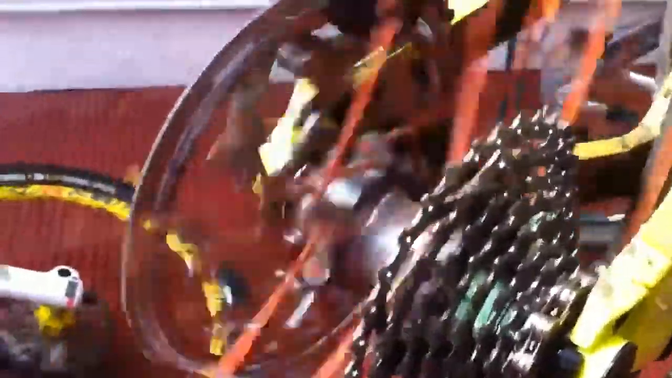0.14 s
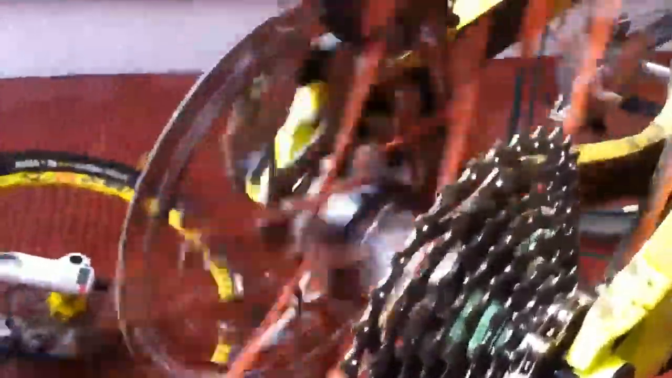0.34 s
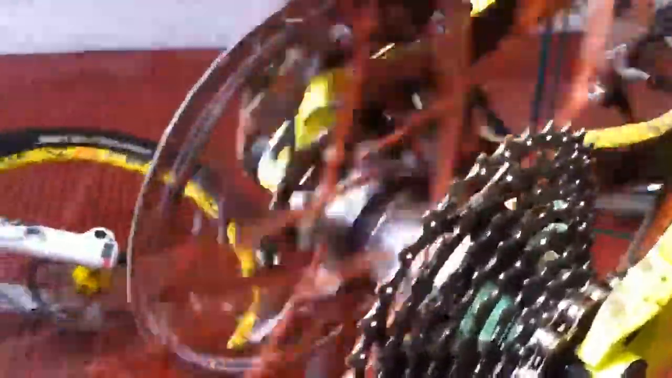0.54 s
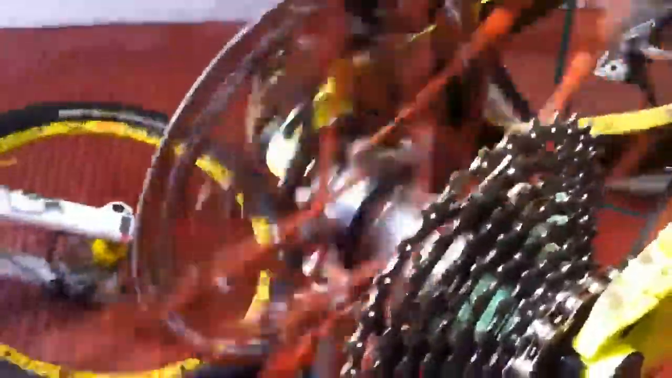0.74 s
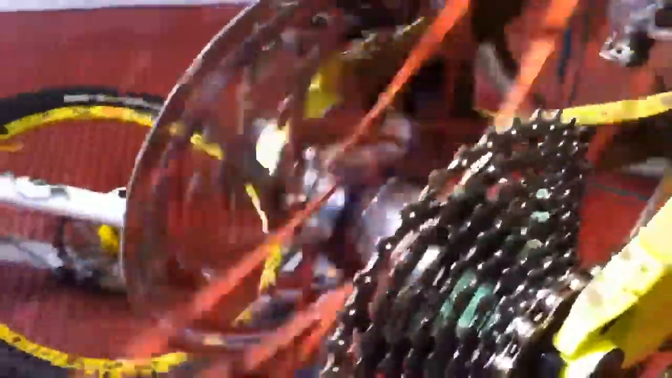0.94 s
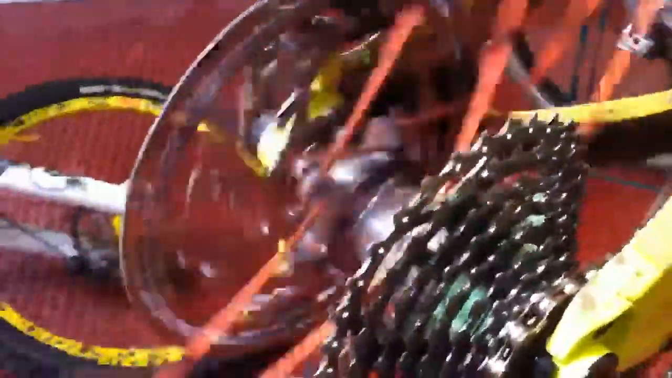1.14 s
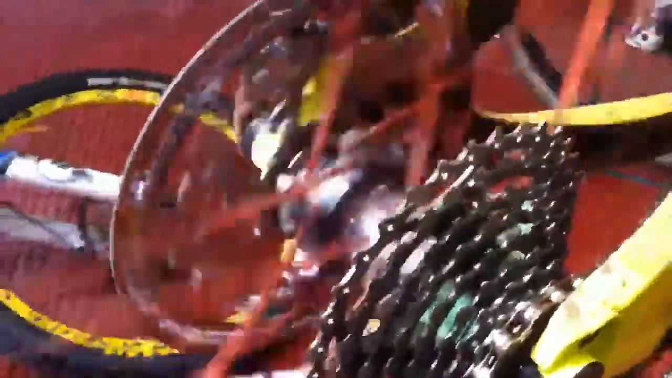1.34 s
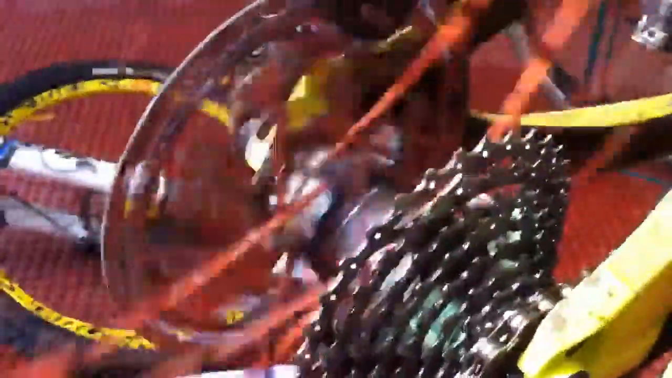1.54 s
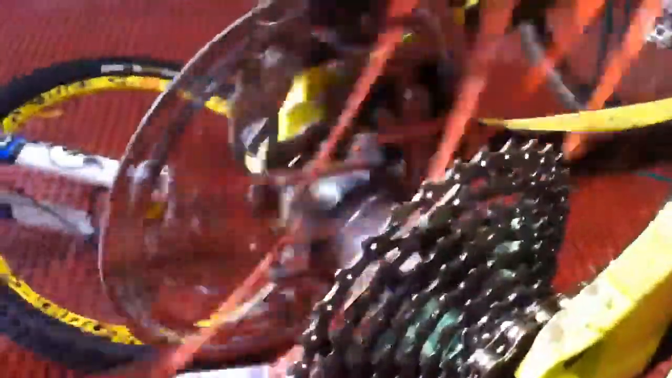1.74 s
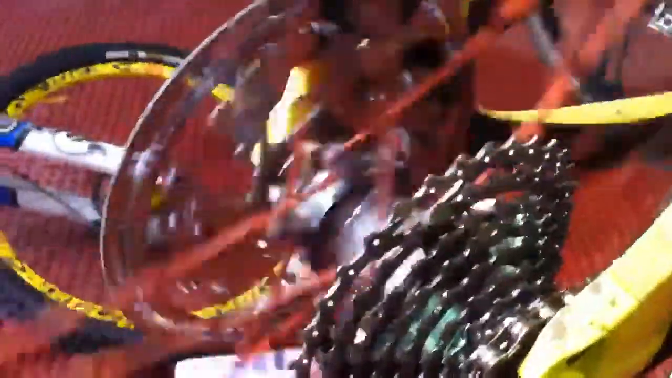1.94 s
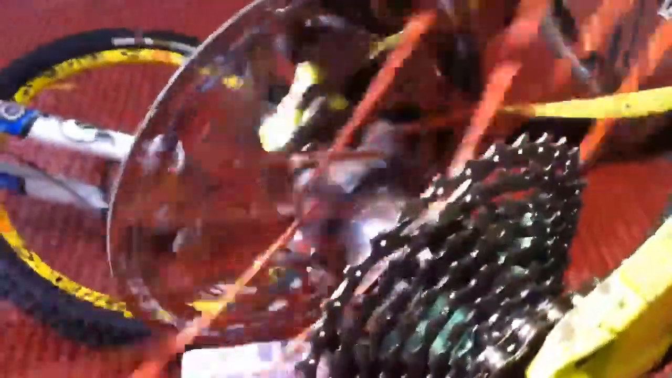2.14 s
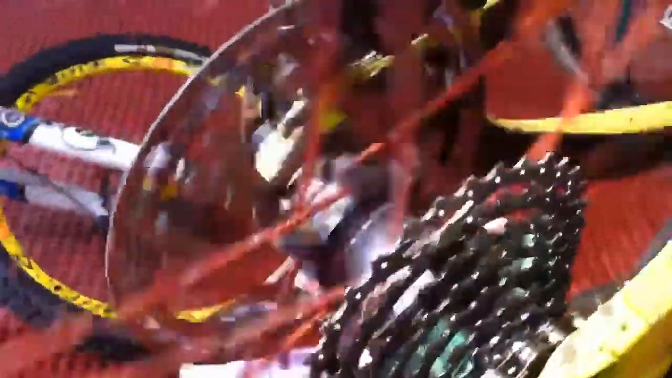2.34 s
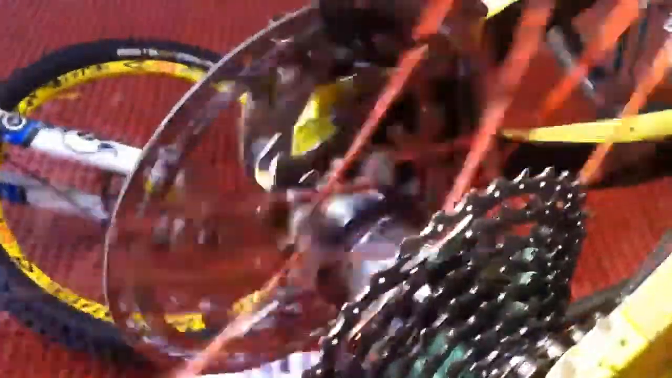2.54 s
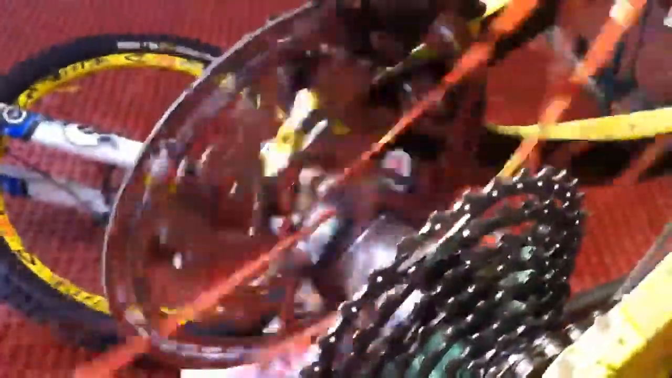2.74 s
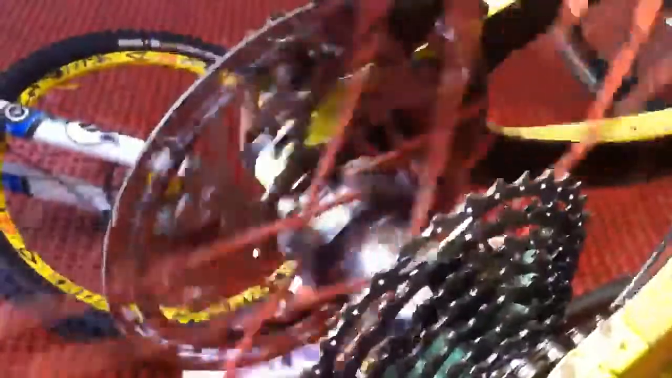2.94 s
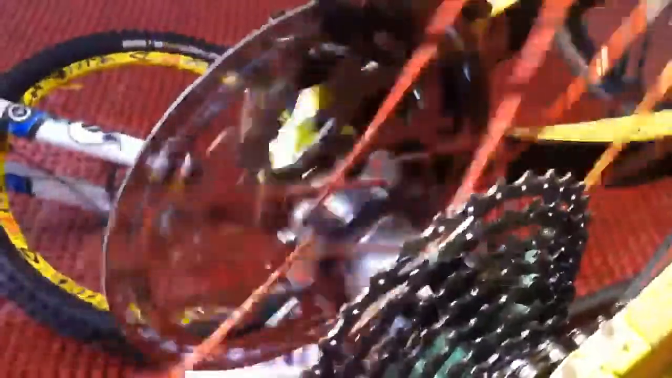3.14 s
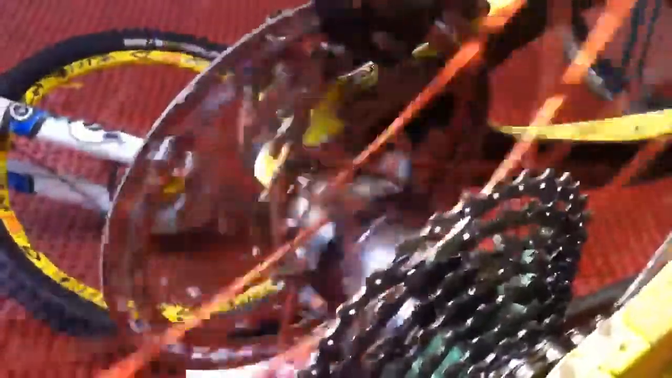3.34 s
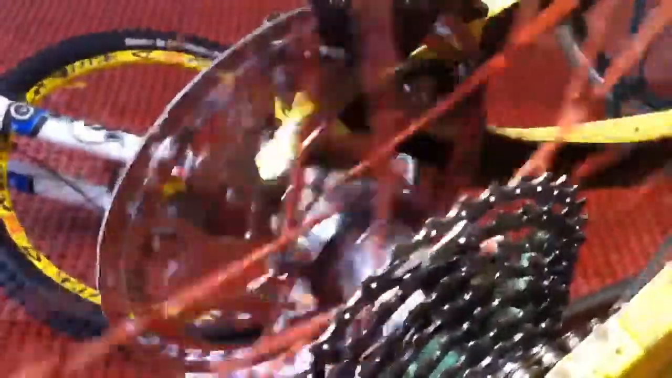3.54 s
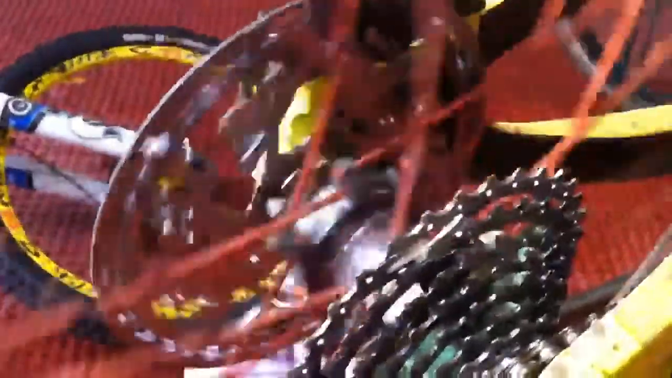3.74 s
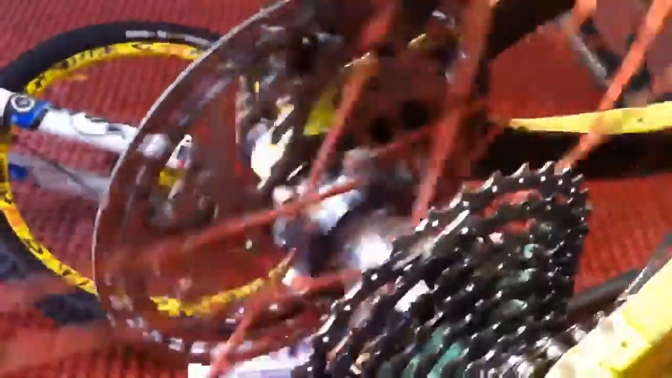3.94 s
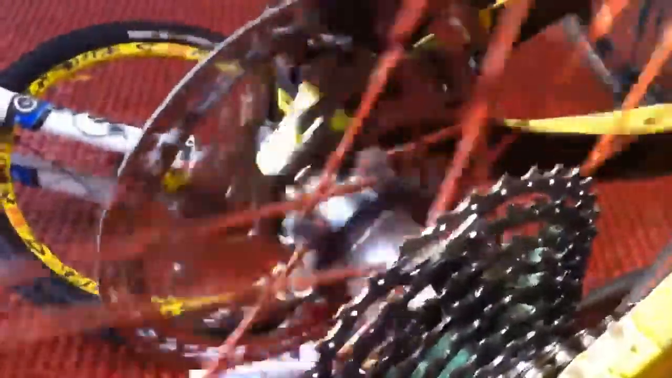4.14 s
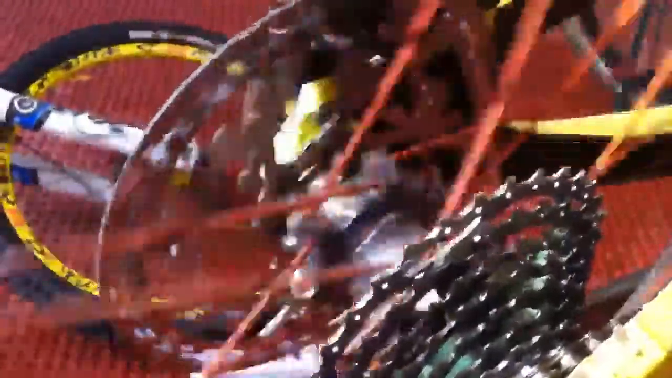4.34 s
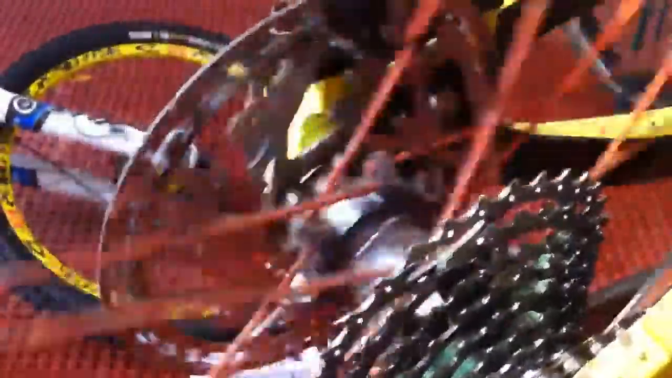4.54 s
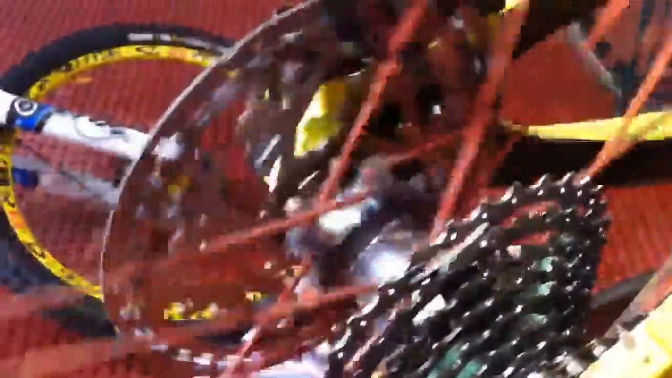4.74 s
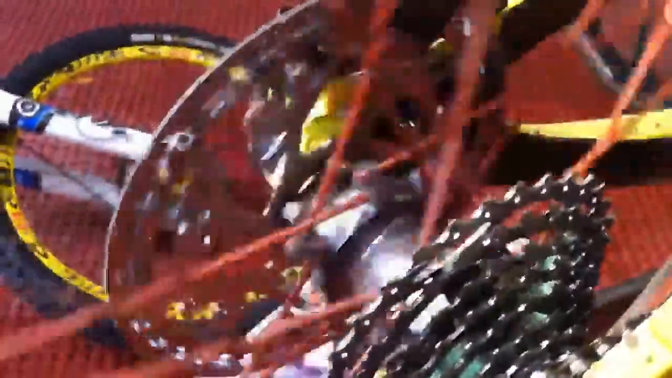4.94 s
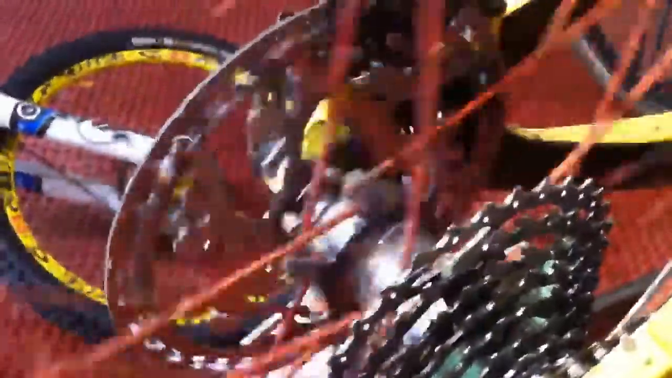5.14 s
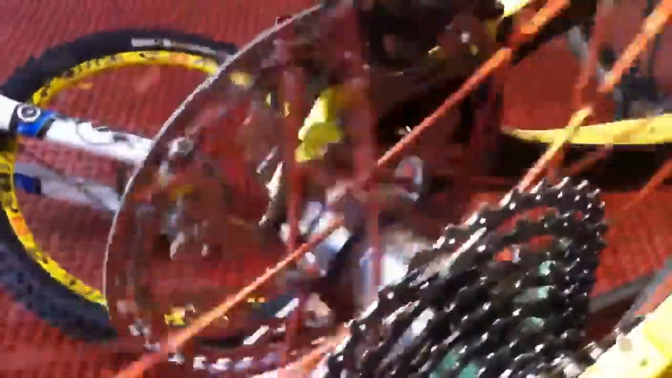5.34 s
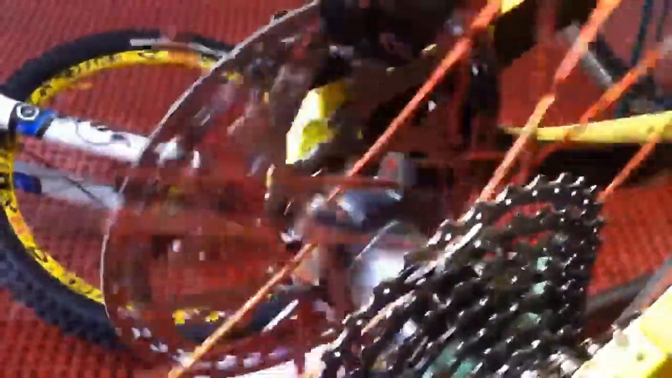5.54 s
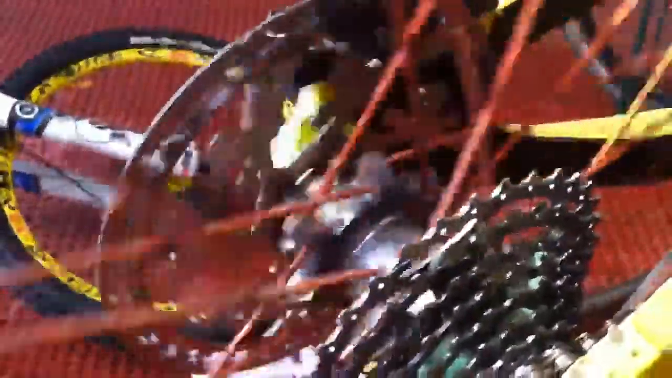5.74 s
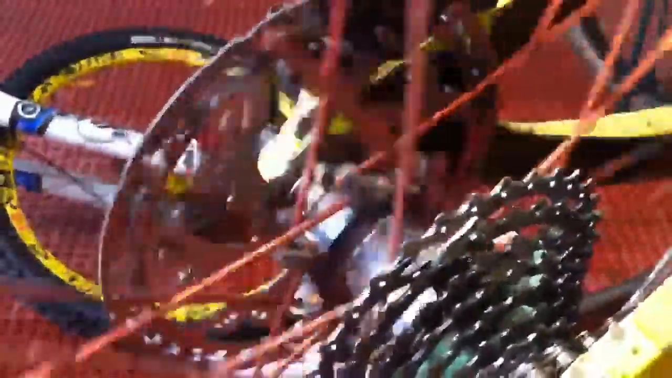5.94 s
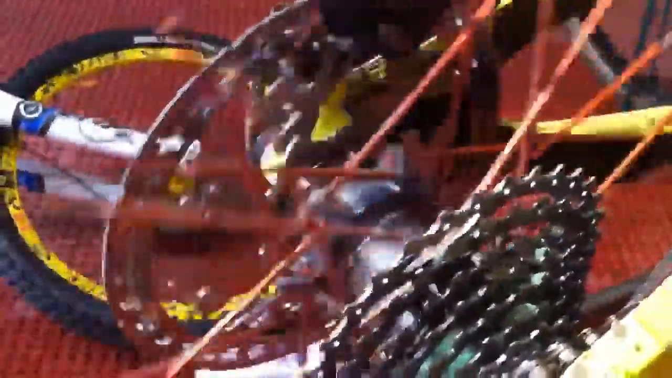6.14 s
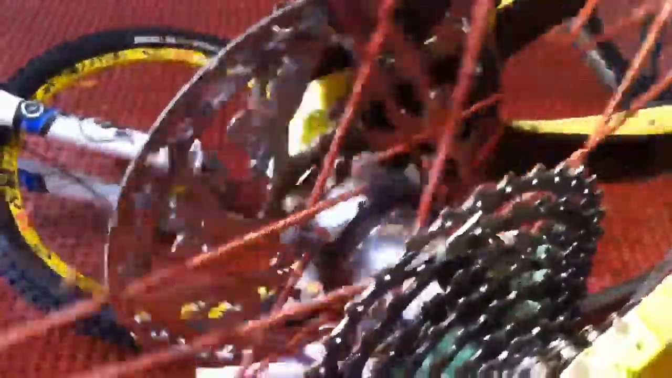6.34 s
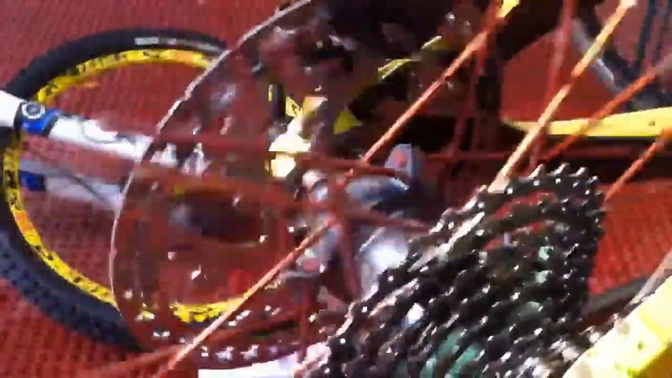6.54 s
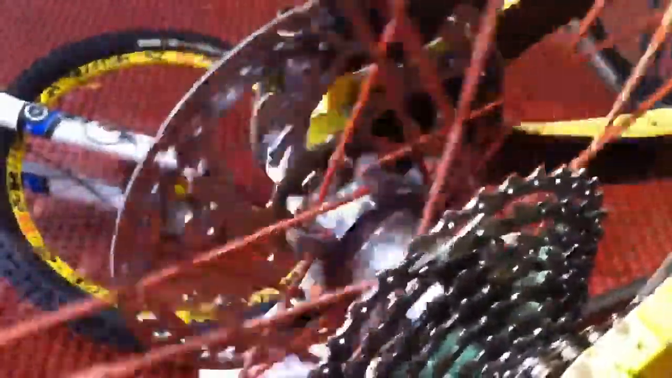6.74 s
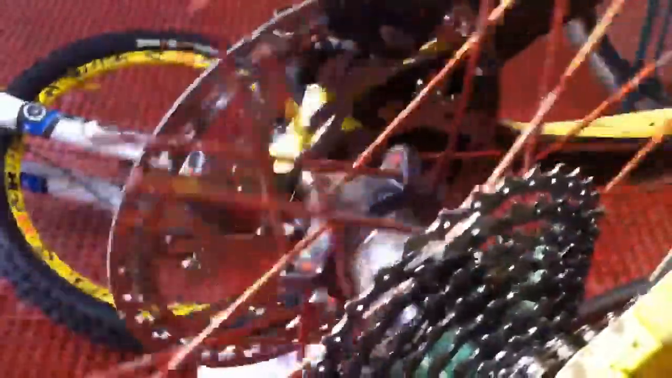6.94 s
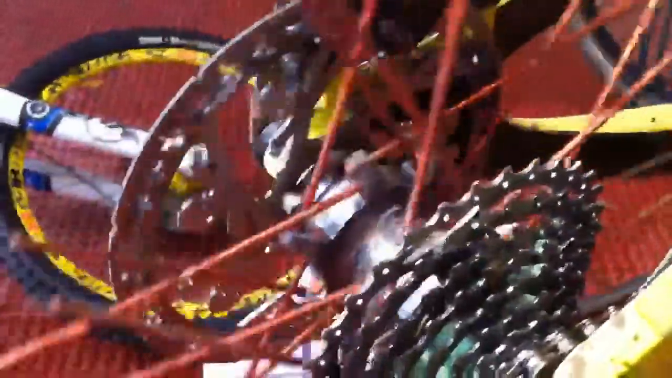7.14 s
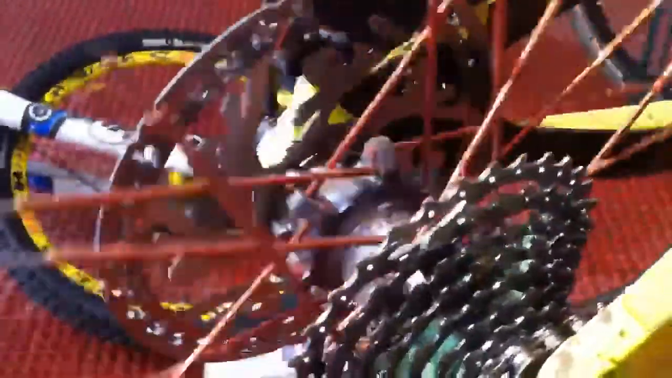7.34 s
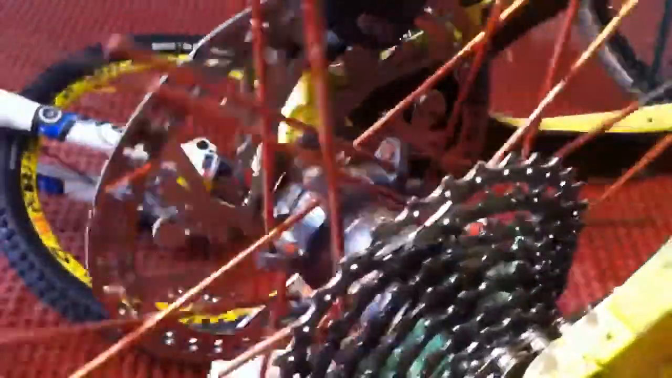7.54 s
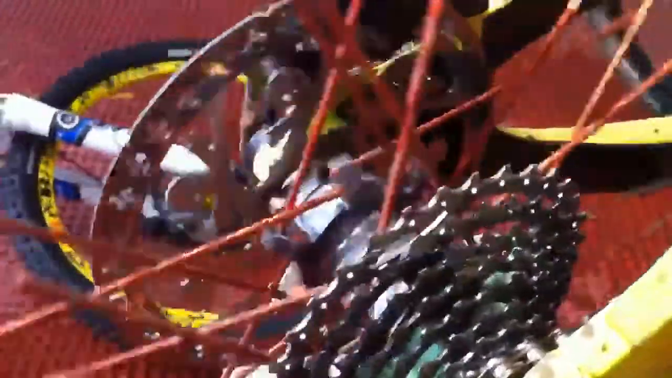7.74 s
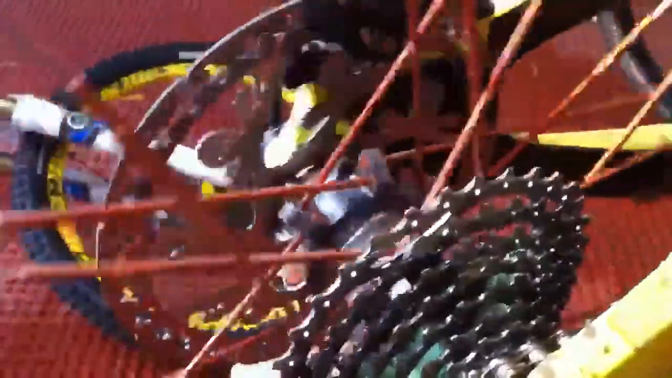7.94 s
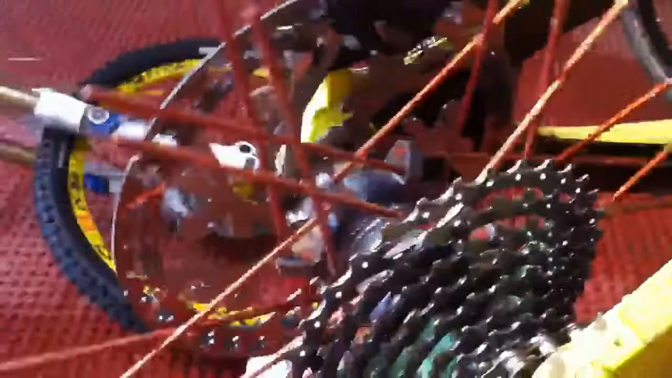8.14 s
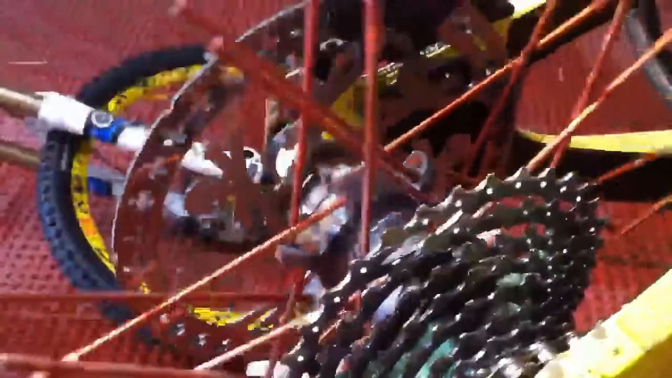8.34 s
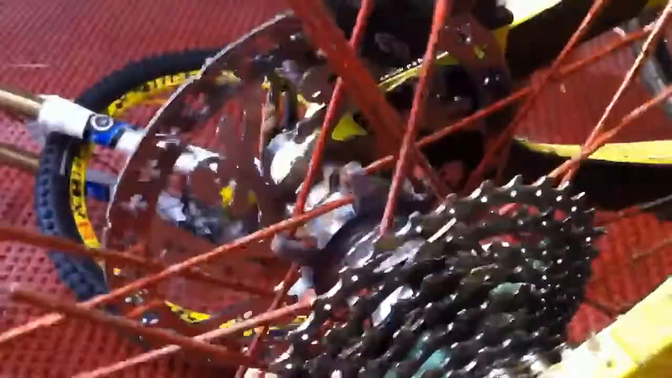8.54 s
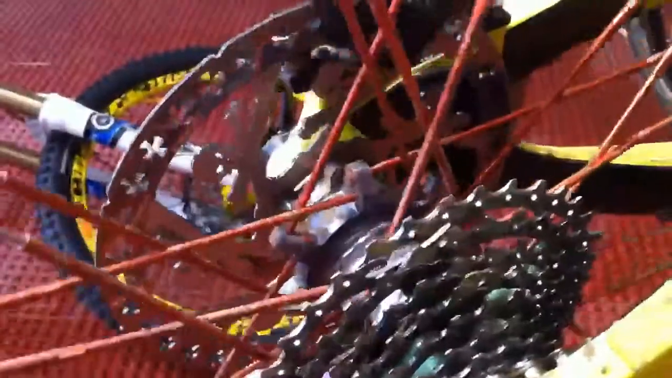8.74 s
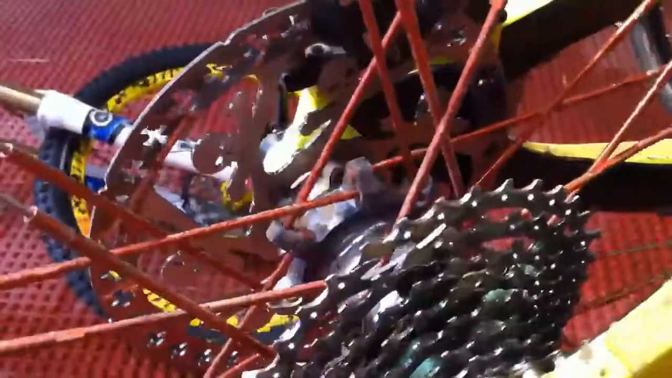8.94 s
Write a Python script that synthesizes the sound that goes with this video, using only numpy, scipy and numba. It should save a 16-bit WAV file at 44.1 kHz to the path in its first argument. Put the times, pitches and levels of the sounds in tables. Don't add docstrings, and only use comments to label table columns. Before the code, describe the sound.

A freewheeling bicycle hub, heard very near in mono, snaps its pawls over a ratchet. A rapid, sizzling whirr loosens into clattering clicks and finally single, slightly uneven ticks, each with a short hollow metal ring and a faint dull room tail. Low mains hum, steady airy hiss and a few quiet clothing rubs sit behind. The last tick comes near nine seconds.

```python
import sys
import numpy as np
from scipy import signal
from scipy.fft import rfft, irfft
from scipy.io import wavfile
from scipy.ndimage import uniform_filter1d
from numba import njit

SR = 44100
rng = np.random.default_rng(int(sys.argv[2]) if len(sys.argv) > 2 else 0)


def log_audio(samples):
    frames = np.atleast_2d(samples).T
    limited = np.clip(frames, -1, 1)
    pcm = np.round(limited * 32767).astype(np.int16)
    wavfile.write(sys.argv[1], SR, pcm)


def voltage_ratio(decibels):
    exponent = np.asarray(decibels, float) / 20
    return 10 ** exponent


N = 400428


def colour(x, points):
    hz, db = np.transpose(points)
    log_hz = np.log(np.fft.rfftfreq(N, 1 / SR) + 1)
    return irfft(rfft(x) * voltage_ratio(np.interp(log_hz, np.log(hz), db)), N)


def unit(x):
    return x / np.sqrt(np.mean(x ** 2))


def noise(points):
    return unit(colour(rng.standard_normal(N), points))


def fade(x, t60_s):
    return signal.lfilter([1], [1, -np.exp(-np.log(1000) / t60_s / SR)], x)


def walk(rate_hz):
    k = int(SR / rate_hz)
    steps = np.repeat(rng.standard_normal(N // k + 1), k)
    return unit(uniform_filter1d(uniform_filter1d(steps, k), k)[:N])


# frequency_hz, level_db (per Hz)
AIR_COLOUR = [(24, -62), (40, -19), (58, -15), (88, -19), (120, -5), (365, -3), (448, -7), (610, -2.5),
              (775, -3.5), (1050, -6.5), (1110, -6), (1390, -4.5), (2400, -4.5), (3120, -43), (5280, -120)]
# frequency_hz, level_db (per Hz)
HISS_COLOUR = [(2000, -74), (2600, -3), (3300, -9.5), (4400, -7), (5400, -8), (6600, -4.5), (8500, -0.5),
               (9900, -12), (12000, -15), (15000, -19), (16000, -24)]
# pitch_hz, level_db (rms)
HUM_TONES = [(120.2, -68), (177, -70), (240.4, -63.5), (600.5, -67)]


def shop():
    t = np.arange(N) / SR
    air = voltage_ratio(-46.5 + .5 * walk(2.25)) * noise(AIR_COLOUR)
    hiss = voltage_ratio(-48.5) * noise(HISS_COLOUR)
    hum = 0
    for hz, db in HUM_TONES:
        level = voltage_ratio(db + 4 + 1.5 * walk(6))
        hum = hum + level * np.sin(2 * np.pi * hz * t + hz / 200 * walk(12))
    return air + hiss + hum


# middle_s, length_s, level_db, centre_hz, width_octaves
SCUFFS = [
    (.91, 0.21, -43.5, 870, 1.4),
    (1.429, 0.11, -45.5, 885, 0.99),
    (2.956, 0.13, -44.5, 910, 1.9),
    (3.407, 0.13, -42, 350, 0.38),
    (3.47, .2, -46.5, 200, 1.8),
    (3.487, 0.27, -43, 640, 1.9),
    (3.59, 0.066, -47, 200, 0.74),
    (4.522, 0.13, -44.5, 500, 3.7),
    (5.173, 0.15, -48.5, 600, 2.3),
]


def scuffs():
    t, out = np.arange(N) / SR, 0
    for s, length_s, db, hz, octaves in SCUFFS:
        half, far = 2 ** (octaves / 2), 8 ** octaves
        band = [(hz / far, -40), (hz / half, -2), (hz * half, -2), (hz * far, -40)]
        grains = rng.standard_normal(N) * voltage_ratio(2.2 * walk(40))
        swell = np.exp(-(2 * (t - s) / length_s) ** 2)
        out = out + voltage_ratio(db) * swell * unit(colour(grains, band))
    return out


CLICKS_PER_TURN = 48


def per_turn(n, table):
    turns = [size * np.cos(2 * np.pi * int(times) * (n - peak) / CLICKS_PER_TURN) for times, size, peak in table]
    return sum(turns)


START_PER_S = 79.355
# times_per_turn, size (clicks/s squared), peak_click
HEAVY_SPOT = [(1, 51.94, 15.008), (2, 19.51, .78)]


def coast(order=4):
    coasting_clicks, energy_gone_at_click, first_click_s = 334, 358.71, .0144
    n = np.arange(-order, coasting_clicks * order) / order
    spent = n / energy_gone_at_click
    energy = START_PER_S ** 2 * (1 - spent) * (1 + .07915 * spent - .09454 * spent ** 2)
    speed = np.sqrt(energy + per_turn(n, HEAVY_SPOT))
    s = (np.cumsum(1 / speed) - .5 / speed) / order
    return n[::order], (first_click_s + s - s[order])[::order], speed[::order]


# times_per_turn, swing_db, peak_click
SHELL_SWING = [(1, .45, 32.5), (2, .4, 18.9), (23, .35, .68), (24, .7, 1)]
RIM_SWING = [(1, 1.1, 33.9), (2, 4.5, 20.55), (4, 1.05, 3.4), (6, 1.6, 7.27), (23, 1.1, .21), (24, .7, 1)]
CASSETTE_SWING = [(1, .9, 28), (6, .55, 1.43), (23, .65, .81), (24, .8, 1)]
# times_per_turn, swing_hz, peak_click
PITCH_SWING = [(1, 12, 20.5), (2, 14, 11.8), (3, 11, 12.6)]
# start_s, blow_db, rim_db, pawl_scatter_ms
LAST_CLICKS = [(6.6799, -34.5, -28, 2.6), (6.7275, -32.5, -23, 7.6), (6.7803, -37, -29.5, 1.4),
               (6.8306, -35.5, -26, 2.8), (6.8819, -38.5, -33.5, 2.3), (6.9317, -34, -35, 5.3),
               (6.9849, -36.5, -32.5, 5.6), (7.0398, -31.5, -38, 3.8), (7.096, -38, -37.5, 1.9),
               (7.1502, -32.5, -30, 6), (7.2111, -40, -33, 2.3), (7.2676, -35.5, -39, 6.1),
               (7.3333, -38, -38.5, 4.1), (7.3982, -34.5, -34, 2.9), (7.464, -34.5, -35.5, 9.4),
               (7.5322, -33, -49, 8.2), (7.6105, -35, -35.5, 2.3), (7.6872, -32.5, -32, 1.9),
               (7.765, -37, -36.5, 1.1), (7.8451, -34, -28.5, 1.7), (7.9283, -36, -33, 2.3),
               (8.0131, -35, -32, 1.7), (8.0955, -36, -29.5, 12.6), (8.1907, -34, -28.5, 7.8),
               (8.2984, -35, -43, 1.9), (8.4039, -36, -25.5, 2.5), (8.5397, -38, -23.5, 2.3),
               (8.6887, -36.5, -27, 4), (8.9285, -48, -30.5, 3.3), (8.957, -37.5, -40, 1.5)]


def clicks():
    n, s, speed = coast()
    slower = np.log2(START_PER_S / speed)
    chance = rng.standard_normal((5, len(n)))
    full_speed_db = np.c_[[-30.6, -29.3, -29.6]]
    slowing_db = np.outer([-1.4, -.7, -2.3], slower)
    swing_db = [per_turn(n, table) for table in (SHELL_SWING, RIM_SWING, CASSETTE_SWING)]
    parts_db = full_speed_db + slowing_db + swing_db + np.c_[[1.2, 2, 1.5]] * chance[:3]
    chance_hz = 18
    rim_hz = 2102 + per_turn(n, PITCH_SWING) + slower * (-15 + chance_hz * chance[3])
    looser_db = 2.2 - 1.6 * (-1) ** n
    scatter_ms = 2.6 * voltage_ratio(looser_db * slower + 2.5 * chance[4])
    coasting = [s, *parts_db, rim_hz, scatter_ms]

    last_s, blow_db, last_rim_db, last_ms = np.transpose(LAST_CLICKS)
    last_hz = 2085 + 2 * chance_hz * rng.standard_normal(len(LAST_CLICKS))
    return np.hstack([coasting, [last_s, blow_db, last_rim_db, blow_db - 5, last_hz, last_ms]])


def pawls(s, scatter_ms):
    lag_s = np.outer(np.abs(scatter_ms) / 1e3, [0, .4, .8])
    share = (1.6 + 0.26 * rng.random(lag_s.shape)) * [.55, 1, .7]
    share /= np.sqrt(np.sum(share ** 2, axis=1, keepdims=True))
    return ((s[:, None] + lag_s) * SR).astype(int), share


@njit
def add(out, at, size, pole, damp, rise):
    for g in range(len(at)):
        z, p, gap, i = size[g] + 0j, pole[g], 1., at[g]
        while i < len(out) and z.real ** 2 + z.imag ** 2 > 1e-9:
            out[i] += z.imag * (1 - gap)
            z, p, gap, i = z * p, p * damp, max(gap * rise, 1e-9), i + 1


def ring(at, blow, modes, scatter_db, detune, choke_s, rise_s, pitch=1):
    hz, t60_s, db = np.transpose(modes)
    chance = rng.standard_normal((at.size, len(modes), 3))
    size = voltage_ratio(db + scatter_db * chance[..., 0]) * np.sign(chance[..., 1]) * blow.reshape(-1, 1)
    turning = 2j * np.pi * pitch * hz * (1 + detune * chance[..., 2])
    pole = np.exp((turning - np.log(1000) / t60_s) / SR)
    damp, rise = np.exp(-2 / (choke_s * SR) ** 2), np.exp(-1 / (rise_s * SR))
    out = np.zeros(N)
    add(out, np.repeat(at, len(modes)), size.ravel(), pole.ravel(), damp, rise)
    return out


# pitch_hz, fade_s (to -60 dB), level_db
SHELL_MODES = [(4110, 0.05, -8.5), (5094, 0.082, -4), (5430, 0.082, -7), (5755, 0.071, -3),
               (5990, 0.047, -8.5), (6740, 0.029, -10.5), (7316, .04, 0), (7710, 0.051, -7.5),
               (7920, 0.059, -2.5)]
# pitch_hz, fade_s (to -60 dB), level_db
CASSETTE_MODES = [(9860, .05, 0), (11080, .04, 0), (12000, .03, -5), (13800, .035, -2), (14650, .04, 0),
                  (15300, .03, -3)]
# pitch_ratio (times the rim's pitch), fade_s (to -60 dB), level_db
RIM_MODES = [(.92, 0.034, -2), (1.002, 0.07, 4), (1.077, 0.18, -13), (1.378, 0.15, -15.5)]


def ringing_parts(at, shell, cassette, rim, rim_hz):
    out = voltage_ratio(-6) * ring(at, shell, SHELL_MODES, 4.5, .008, choke_s=.045, rise_s=.0002)
    out += voltage_ratio(-6.5) * ring(at, cassette, CASSETTE_MODES, 5, .005, choke_s=.02, rise_s=.0002)
    out += voltage_ratio(-3) * ring(at[:, 1] - 30, rim, RIM_MODES, 1.3, .0085, choke_s=.011, rise_s=.0025,
                          pitch=rim_hz[:, None])
    return out


# frequency_hz, level_db (per Hz)
CROWD_COLOUR = [(1000, -28), (1700, -12), (2500, -8.5), (3400, -11), (4500, -8), (5500, -3), (6500, -6),
                (7700, -1), (9000, -4), (11000, -1), (12800, -5), (14500, 0), (15800, -1)]
# frequency_hz, level_db
WASH_LOSS = [(2500, -2), (4000, -5), (5000, 0), (9000, 0), (12500, -5), (16000, -4)]
# frequency_hz, level_db
ROOM_LOSS = [(3000, 6.5), (8500, -3), (11000, -20), (16000, -16)]


def crack_and_tail(at, shell, cassette):
    energy = np.bincount(at.ravel(), (shell * cassette).ravel(), N)[:N]
    energy = np.abs(uniform_filter1d(energy, size=40, origin=19))
    crowd = noise(CROWD_COLOUR)
    crack = voltage_ratio(7.5) * np.sqrt(fade(energy, 0.018 / 2)) * crowd
    wash = voltage_ratio(3) * np.sqrt(fade(energy, 0.081 / 2)) * colour(np.roll(crowd, N // 4), WASH_LOSS)
    room = voltage_ratio(-11.5) * np.sqrt(fade(energy, 0.71 / 2)) * colour(np.roll(crowd, N // 2), ROOM_LOSS)
    contact = cassette[:, 1] * np.sign(rng.standard_normal(len(at)))
    tick = voltage_ratio(25) * colour(np.bincount(at[:, 1], contact, N)[:N], CROWD_COLOUR)
    return crack + wash + room + tick


def freehub():
    s, shell_db, rim_db, cassette_db, rim_hz, scatter_ms = clicks()
    at, share = pawls(s, scatter_ms)
    shell = voltage_ratio(shell_db)[:, None] * share
    cassette = voltage_ratio(cassette_db)[:, None] * share
    return ringing_parts(at, shell, cassette, voltage_ratio(rim_db), rim_hz) + crack_and_tail(at, shell, cassette)


def thin_treble(x, under_db, size=8, order=4):
    cells = signal.stft(x, nperseg=256)[2]
    power = np.abs(cells) ** 2
    rows, columns = power.shape
    bands = uniform_filter1d(power, size=order + 1, axis=0)[::order].repeat(order, axis=0)[:rows]

    def in_blocks(values):
        return np.pad(values, (3, -(columns + 3) % size)).reshape(-1, size)

    def spread(per_block):
        return per_block.repeat(size)[3:3 + columns]

    blocks = in_blocks(power.mean(axis=0))
    loudest = spread(blocks.max(axis=1))
    struck = spread(blocks.max(axis=1) > 2.5 * blocks.min(axis=1))
    rim_ring = spread(in_blocks(power[12]).mean(axis=1))
    bar = loudest * voltage_ratio(2 * under_db) + np.outer(np.arange(rows) < 28, rim_ring) * voltage_ratio(-43)
    cells[16:] *= np.where((bands < bar) & struck, .03, 1)[16:]
    return signal.istft(cells, nperseg=256)[1][:N]


def scene():
    return (shop() + scuffs() + freehub())[None]


def roll_off(x):
    return signal.sosfilt(signal.butter(12, 17000, fs=SR, output="sos"), x)


def record(dry):
    top_cut = signal.ellip(14, .2, 70, 15850, fs=SR, output="sos")
    mix = thin_treble(signal.sosfilt(top_cut, dry[0]), under_db=-15.8)[None]
    return roll_off(mix)


dry = scene()
out = record(dry)
log_audio(out)
```